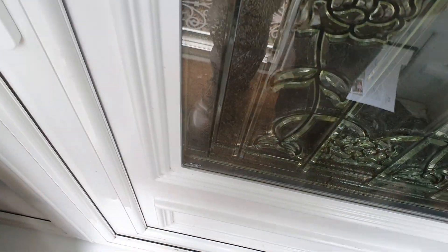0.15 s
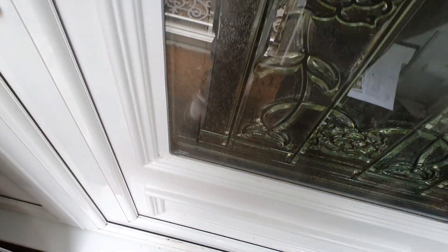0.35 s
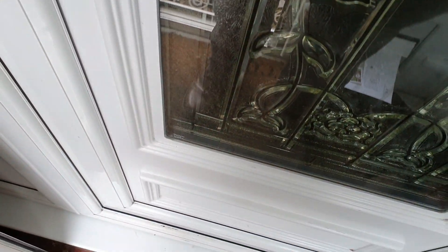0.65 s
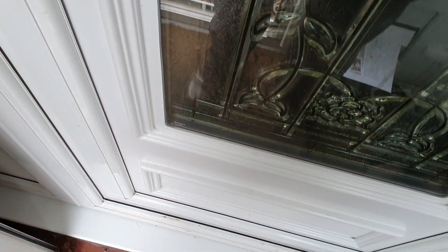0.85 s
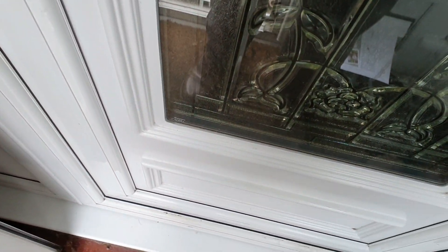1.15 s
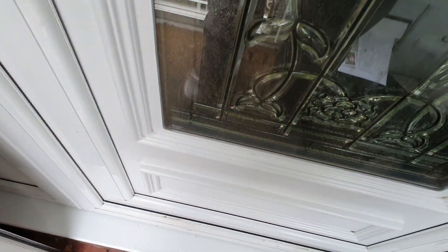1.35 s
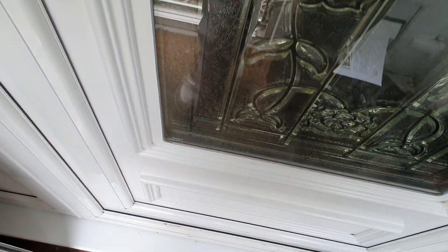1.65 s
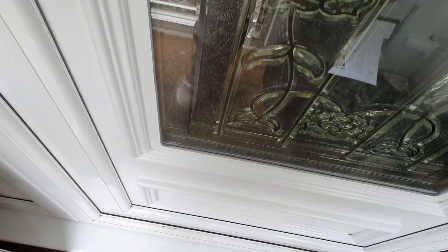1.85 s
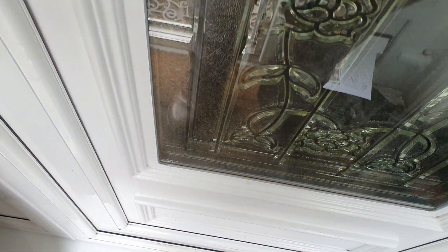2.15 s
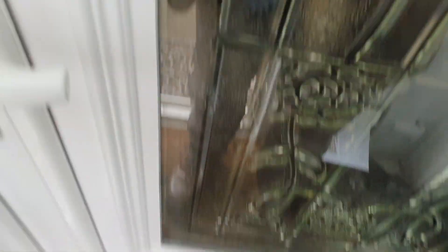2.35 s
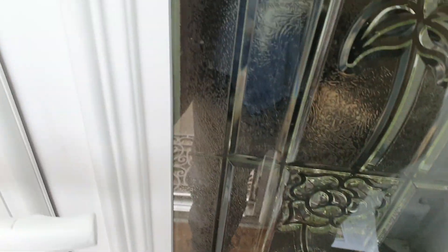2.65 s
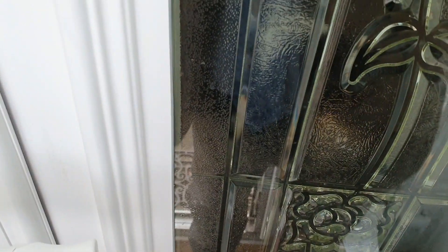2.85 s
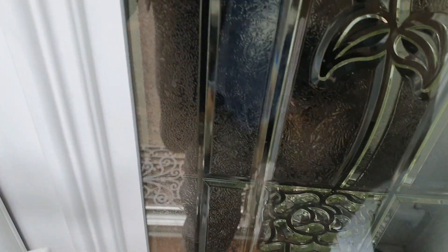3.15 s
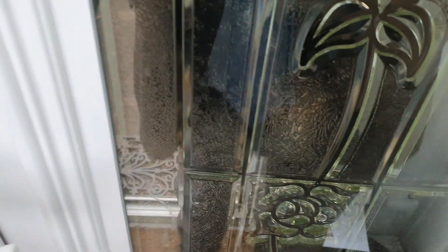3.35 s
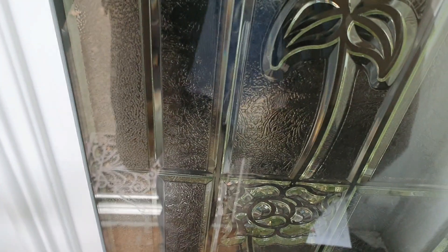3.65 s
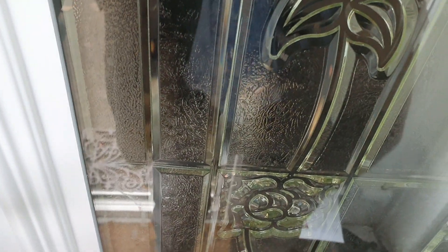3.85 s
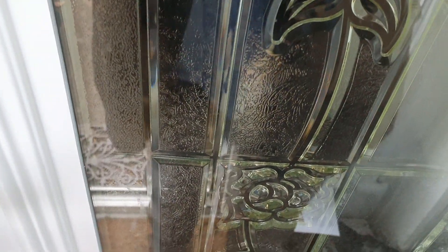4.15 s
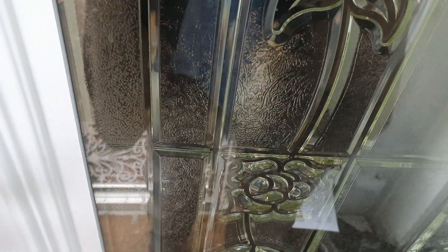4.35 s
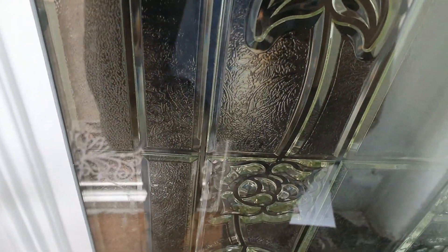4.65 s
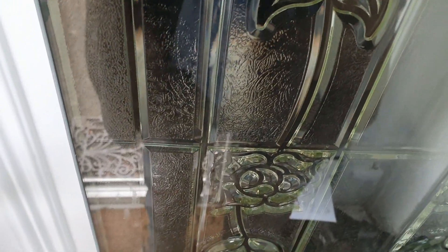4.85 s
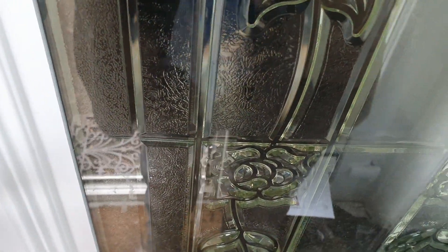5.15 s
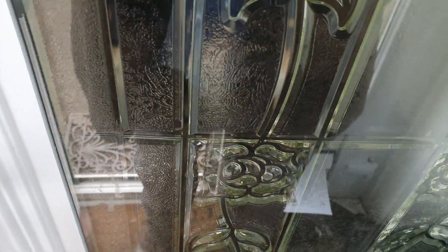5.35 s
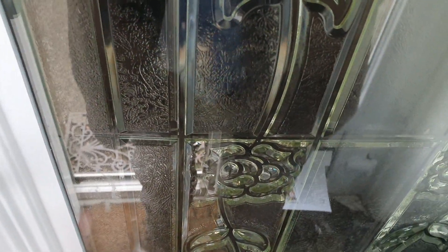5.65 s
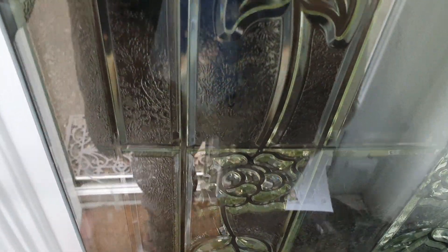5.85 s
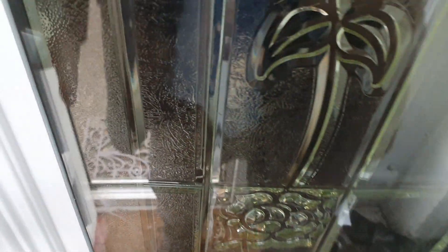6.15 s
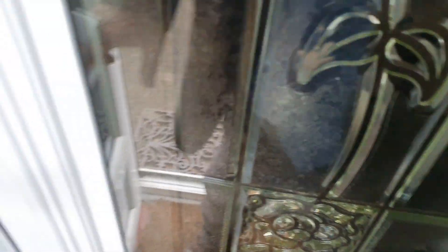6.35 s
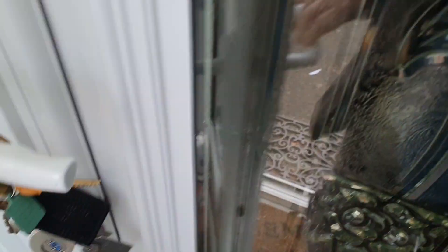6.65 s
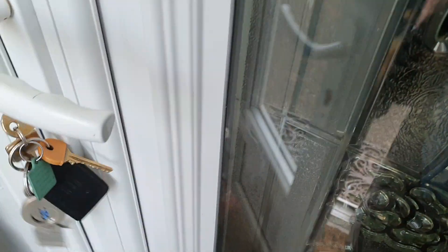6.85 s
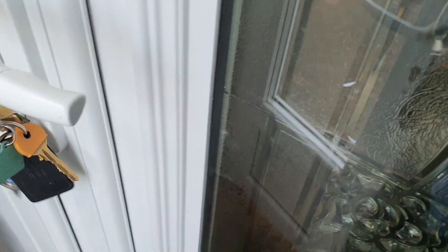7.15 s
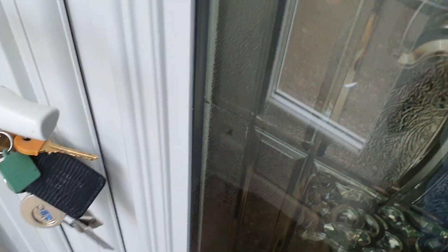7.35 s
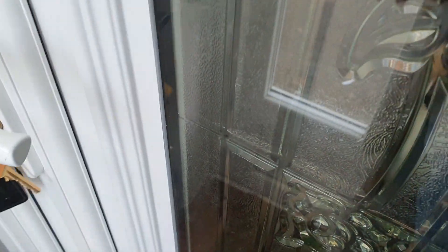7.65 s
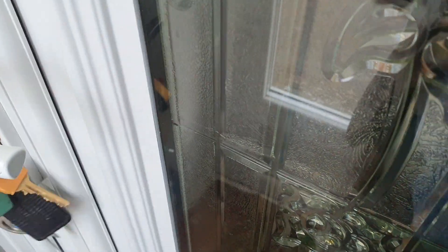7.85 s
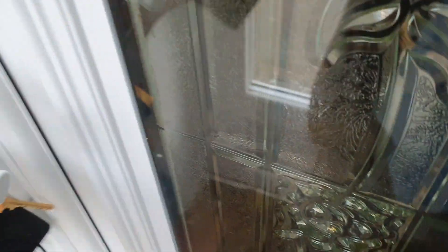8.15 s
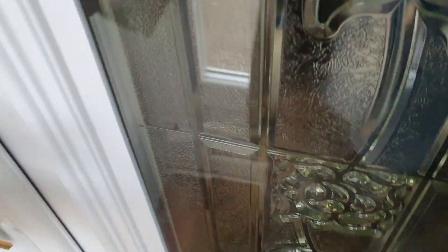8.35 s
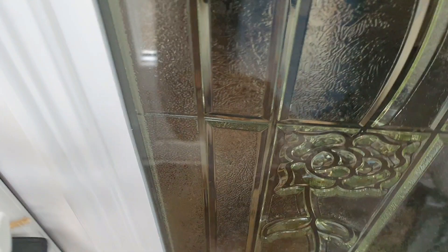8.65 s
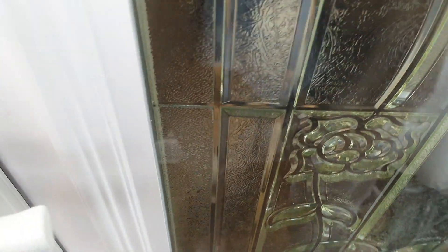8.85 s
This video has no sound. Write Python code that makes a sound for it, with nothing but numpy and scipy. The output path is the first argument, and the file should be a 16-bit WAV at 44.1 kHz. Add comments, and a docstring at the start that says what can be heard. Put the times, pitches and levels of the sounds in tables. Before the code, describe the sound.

In the hallway of a house, a bunch of steel keys jangles close to the microphone while an engine drones and tyres hiss outside, slowly fading. The keys then work the lock of a glazed plastic door, with repeated sharp clicks, rattles and dull thumps through the panel. The door swings and closes with a loud clunk that shakes its glass. The street goes quiet, and a few lighter clicks and clinks follow.

```python
"""In the hallway of a house, a bunch of keys jangles and works the lock of a glazed plastic door.
Steel keys crack and ring as they hit each other, and the lock clicks and rattles. Pushes and blows
shake the door's panel and glass; it swings and clunks shut. Outside, an engine drones and tyres hiss.
A phone with two spaced microphones listens close by."""
import sys
import numpy as np
from scipy import signal
from scipy.fft import rfft, irfft, next_fast_len
from scipy.io import wavfile
from scipy.ndimage import uniform_filter1d, map_coordinates

SR = 44100
rng = np.random.default_rng(int(sys.argv[2]) if len(sys.argv) > 2 else 0)


def dump_mix(stems):
    """Bounce the given channels to the path in sys.argv[1] as a 16-bit WAV at rate SR."""
    frames = np.atleast_2d(stems).T  # one column per channel
    limited = np.clip(frames, -1, 1)  # hard clip at full scale
    pcm = np.round(limited * 32767).astype(np.int16)
    wavfile.write(sys.argv[1], SR, pcm)


N = 397341


def amp(db):
    """Turn decibels into a gain."""
    return 10 ** (np.asarray(db) / 20)


def along(points, hz):
    """Read between (Hz, value) points on a log frequency axis."""
    f, values = np.transpose(points)
    return np.interp(np.log(hz + 1), np.log(f + 1), values)


def level_curve(points):
    """Join (time, dB) points into one level per sample, silent before the first."""
    return np.interp(np.arange(N) / SR, *np.transpose(points), left=-120)


def wobble(rate):
    """A smooth random curve through rate points a second."""
    return map_coordinates(rng.standard_normal(int(N * rate / SR) + 4), [np.arange(N) * rate / SR])


def filtered(x, response):
    """Scale and shift each frequency of x by response(Hz)."""
    size = next_fast_len(x.shape[-1] + 8192)
    return irfft(rfft(x, size) * response(np.fft.rfftfreq(size, 1 / SR)), size)[..., :x.shape[-1]]


def coloured(points):
    """A response through (Hz, dB) points."""
    return lambda hz: amp(along(points, hz))


def resonances(peaks):
    """A response made of (centre Hz, width Hz, dB) peaks."""
    return lambda f: sum((-1) ** k * amp(db) * 1j * f * width / (hz * hz - f * f + 1j * f * width)
                         for k, (hz, width, db) in enumerate(peaks))


def noise(response, grain_db=0., rate=400):
    """Stereo noise of average (rms) size 1; grain_db makes it lumpy."""
    # how alike the two microphones hear: (frequency [Hz], likeness [0 to 1])
    likeness = [(30, .995), (150, .985), (400, .85), (800, .45), (3000, .25), (15000, .15)]

    def mid_and_side(hz):
        angle = np.arccos(np.clip(along(likeness, hz), -1, 1)) / 2
        return response(hz) * [np.cos(angle), np.sin(angle)]

    pair = rng.standard_normal((2, N)) * amp(grain_db * wobble(rate))
    mid, side = filtered(pair, mid_and_side)
    stereo = np.array([mid + side, mid - side])
    return stereo / np.sqrt(np.mean(stereo ** 2) + 1e-20)


def bursts(times, db, t60, rise, pan_db=0):
    """Stereo loudness shape: each blow swells over rise seconds and fades 60 dB in t60 seconds."""
    power = np.zeros((2, N + 2 * SR))
    for start, level, life, pan, swell in np.broadcast(times, db, t60, pan_db, rise):
        t = np.arange(int(np.clip(life, .005, 1.9) * SR)) / SR
        shape = amp(level - 60 * t / life) * (1 - np.exp(-t / max(swell, 1e-4)))
        power[:, round(start * SR):][:, :len(t)] += (amp([[pan / 2], [-pan / 2]]) * shape) ** 2
    return np.sqrt(power[:, :N])


def spikes(times, db, pan_db, response):
    """One sharp pulse per blow, coloured by response."""
    pulses = np.zeros((2, N))
    signs = rng.choice([-1, 1], len(times))
    pulses[:, np.round(times * SR).astype(int)] = amp(db + np.array([pan_db, -pan_db]) / 2) * signs
    return filtered(pulses, response) / np.mean(np.abs(response(np.fft.rfftfreq(4096, 1 / SR))))


def ringing(notes, times, db, scatter_db, damp_db, blur):
    """Each blow rings every note at a new strength; touching parts vary its level and tuning."""
    out, knots = np.zeros((2, N)), np.arange(0, N + 650, 650)
    at = np.clip(np.round(times * SR).astype(int), 0, N - 1)
    for hz, level, t60 in notes:
        draw = rng.uniform(-1.6, 1.6, (len(at), 4))
        blows = np.zeros((2, N), complex)
        for mic in range(2):
            blow_db = db + level + scatter_db * draw[:, 0] + 2.4 * draw[:, 1 + mic]
            blows[mic, at] = amp(blow_db) * np.exp(1j * mic * draw[:, 3])
        pole = amp(-60 / (t60 * SR)) * np.exp(2j * np.pi * hz / SR)
        ring = signal.lfilter([1], [1, -pole], blows)
        touch, twist = (np.interp(np.arange(N), knots, v) for v in rng.standard_normal((2, len(knots))))
        out += (ring * amp(-damp_db * np.abs(touch)) * np.exp(1j * blur * twist)).imag
    return out


def street():
    """An engine's note wavers over road rumble and tyre hiss."""
    # the engine drawing away: (time [s], level [dB])
    engine_levels = [(0.0, -27), (0.9, -35.5), (1.12, -30.5), (2.6, -35), (2.76, -38.5), (4.2, -40.5),
                     (6.2, -49)]
    # a car passes, later the door shuts the street out: (time [s], level [dB])
    road_levels = [(0.0, -43), (0.6, -41.5), (1.25, -47.5), (2.9, -54), (3.9, -56.5), (5.7, -60),
                   (7.9, -59.5), (8.35, -79), (9.01, -78)]
    # tone of the rumble: (frequency [Hz], level [dB])
    rumble_tone = [(12, -50), (20, -13), (32, -1), (53, 0), (67, -3.5), (82, -22), (129, -31.5), (189, -14),
                   (340, -32), (600, -33), (780, -40), (1320, -120)]
    # tone of the tyres: (frequency [Hz], level [dB])
    tyre_tone = [(180, -60), (300, 0), (418, 1), (701, -8.5), (814, 0.5), (1120, 7.5), (1340, -2),
                 (3030, -12.5), (4020, -14), (4520, -25.5), (8790, -32), (16000, -65)]
    t = np.arange(N) / SR
    engine_hz = 48.9 - 1.52 * (t > 2.68) + 1.344 * wobble(5.4)  # the pitch drops once
    engine_db = np.where(t < engine_levels[-1][0], level_curve(engine_levels) + 0.54 * wobble(3.67), -120)
    engine = np.sqrt(2) * amp(engine_db) * np.sin(2 * np.pi * np.cumsum(engine_hz) / SR)
    road_db = level_curve(road_levels)
    flattened = lambda f: amp(np.minimum(along(rumble_tone, f), -17)) / (1 + (40 / (f + 1)) ** 4)
    rumble = amp(0.67 * road_db - 12.5 + 1.6 * wobble(6.1)) * noise(flattened)
    hiss = amp(road_db + 4.0 + 2.3 * wobble(8.2)) * noise(coloured(tyre_tone))
    # the low sounds dip briefly, twice
    dip_db = sum(db * np.exp(-((t - when) / 0.042) ** 2) for when, db in [(3.75, -12), (4.87, -27)])
    return amp(dip_db) * (engine + rumble) + hiss


def hallway(x):
    """The hallway's echo: high notes die a little sooner than low ones."""
    # echo length: (frequency [Hz], fade time [s])
    fade_times = [(300, 0.17), (2000, 0.15), (12000, 0.13)]
    hz, t, spectrum = signal.stft(rng.standard_normal((2, SR // 3)), SR, nperseg=256)
    tail = signal.istft(spectrum * amp(-60 * t / along(fade_times, hz)[:, None]), SR, nperseg=256)[1]
    return signal.fftconvolve(x, tail / np.linalg.norm(tail[0]), axes=1)[:, :N]


def door():
    """Each push or blow sways the door, hums its glass and thumps its panel; the handle rubs."""
    # pushes and blows: (time [s], panel level [dB], upper notes against it [dB], sway [dB], glass [dB])
    blows = [(3.581, -39.5, 2, -58, -52), (3.852, -59, 11, -52, -52), (4.013, -34, -3, -37, -39.5),
             (4.088, -32, -23, -35, -40), (4.147, -36, -6.5, -46, -44), (4.222, -29, -11.5, -39, -36),
             (4.696, -29.5, -12.5, -41.5, -45), (4.935, -33, -26.5, -52, -45),
             (5.061, -17.5, -22.5, -40.5, -35.5), (5.996, -22, -11.5, -55, -45),
             (6.113, -17, -18.5, -48, -52), (6.208, -14.5, -20, -45, -46), (6.79, -43, 2.5, -26, -41),
             (6.874, -28, -0.5, -24, -41), (7.001, -37.5, 1.5, -28, -49), (7.391, -48, 5.5, -36.5, -45),
             (7.513, -24, 3.5, -26, -35), (7.564, -14.5, 4.5, -13.5, -15.5), (7.755, -20, -6.5, -26, -28),
             (7.863, -26.5, -1, -40, -33), (8.001, -26, -6.5, -32, -35.5), (8.262, -36, -9, -38.5, -46),
             (8.36, -54, -2, -42, -64), (8.555, -53, 6, -51, -53), (8.719, -44, 3, -60, -51),
             (8.95, -35.5, 0, -38, -44)]
    # the whole door on its hinges: (frequency [Hz], width [Hz], level [dB])
    sway_peaks = [(32.3, 13, -1), (92, 70, -5.5)]
    # the panel's low notes: (pitch [Hz], level [dB], fade time [s])
    low_notes = [(218, -4.5, 0.29), (173, -7, 0.18)]
    # its upper notes: (pitch [Hz], level [dB], fade time [s])
    upper_notes = [(281.3, 1.5, 0.31), (376.5, -11.5, 0.4), (454.4, -5, 0.19)]
    # its murmur after a blow: (frequency [Hz], width [Hz], level [dB])
    murmur_peaks = [(231, 18, 2.5), (258, 84, 1.5), (396, 120, -11.5), (447, 45, -12.5), (690, 510, -13)]
    # the handle dragging its bolts: (time [s], level [dB])
    rub_levels = [(6.19, -44), (6.292, -34), (6.42, -62)]
    times, panel_db, upper_offset_db, sway_db, glass_db = np.transpose(blows)
    upper_db = panel_db + upper_offset_db
    glass_hz, resting_db = 128.8, -55.5  # at rest the door trembles with the street
    glass = amp(1.6 + 2.2 * wobble(12)) * np.sin(2 * np.pi * np.cumsum(glass_hz + 2.5 * wobble(14)) / SR)
    glass = glass * (bursts(times, glass_db, t60=0.72, rise=0.01) + amp(resting_db - 5))
    sway = noise(lambda f: resonances(sway_peaks)(f) ** 2)
    sway /= np.sqrt(np.abs(uniform_filter1d(np.mean(sway ** 2, axis=0), SR // 12)) + 0.12)  # even it out
    sway *= bursts(times, sway_db + 2.5, t60=0.57, rise=0.023) + amp(resting_db)
    low = ringing(low_notes, times, panel_db - 3.5, scatter_db=1.0, damp_db=-2.0, blur=0.32)
    upper = ringing(upper_notes, times, upper_db + 1.0, scatter_db=2.5, damp_db=4.0, blur=0.85)
    thumps = np.mean(low + upper, axis=0)  # long waves reach both microphones alike
    soft_contact = lambda f: (1j * f / (120 + 1j * f)) ** 2 / (1 + 1j * f / 700)
    rub = noise(resonances([(327, 140, -4), (516, 280, -6.5), (776, 290, -8.5)]), grain_db=-5.5, rate=47)
    rub *= amp(np.where(np.arange(N) / SR < rub_levels[-1][0], level_curve(rub_levels), -120))
    murmur = noise(resonances(murmur_peaks), grain_db=2.0, rate=72)
    murmur *= bursts(times, 0.78 * upper_db - 16, t60=0.82, rise=0.016)  # grows less than the blow
    shudder = noise(resonances([(810, 980, 0), (3600, 1800, 2)]), grain_db=-8.5, rate=78)
    shudder *= bursts(times, upper_db - 23, t60=0.74, rise=0.03)
    return sway + glass + filtered(thumps, soft_contact) + rub + murmur + shudder


def lock():
    """Parts slide and click: a short pulse and a tick, then the case rattles and the panel knocks."""
    # lock clicks: (time [s], level [dB], pitch [Hz], knock level [dB], rattle fade time [s])
    clicks = [(1.983, -38, 956, -50, 0.5), (2.2028, -21.5, 3150, -65, 0.02),
              (2.264, -29, 3700, -57.5, 0.031), (2.6082, -32.5, 3630, -75, 0.11),
              (3.006, -44, 3600, -89, 0.1), (3.58, -19.5, 2010, -35, 0.082),
              (3.7673, -33.5, 2060, -40, 0.059), (3.988, -37, 2000, -54, 0.11),
              (4.018, -29.5, 2030, -50, 0.1), (4.094, -31.5, 1040, -38.5, 0.085),
              (4.281, -31.5, 2160, -49, 0.028), (4.4369, -26.5, 1980, -36, 0.13),
              (4.5334, -16, 2270, -81, 0.16), (4.687, -39, 2620, -51, 0.12),
              (4.6969, -31.5, 1810, -37, 0.25), (4.9313, -20.5, 1930, -32, 0.17),
              (4.9816, -16, 1850, -33.5, 0.073), (5.02, -22, 2590, -50, 0.24),
              (5.0487, -19, 1930, -21, 0.17), (5.069, -12, 2120, -27.5, 0.12),
              (5.1997, -34.5, 1990, -45, 0.083), (5.5884, -36.5, 2303, -62, 0.077),
              (5.6441, -19.5, 2880, -31, 0.053), (5.7383, -38.5, 2360, -68, 0.12),
              (5.8474, -33.5, 2170, -41, 0.15), (5.8762, -26, 3360, -31.5, 0.18),
              (5.9822, -14, 2970, -46, 0.083), (5.996, -10.5, 1600, -38, 0.086),
              (6.0298, -13.5, 3430, -48.5, 0.037), (6.0828, -39, 3190, -60, 0.053),
              (6.111, -17, 1600, -57, 0.07), (6.1466, -12.5, 2880, -46.5, 0.047),
              (6.526, -28.5, 2700, -50, 0.034), (6.551, -30.5, 2810, -41, 0.074),
              (6.5736, -19, 1720, -32, 0.027), (6.624, -29, 1660, -53, 0.13), (6.821, -31, 1120, -33, 0.36),
              (6.9803, -49, 2050, -52, 0.084), (7.5105, -16.5, 2590, -18, 0.19),
              (7.568, -13, 1550, -17.5, 0.31), (7.612, -22, 3320, -29.5, 0.1),
              (7.652, -21.5, 3720, -31.5, 0.15), (7.7306, -27, 2380, -54, 0.2),
              (7.86, -28.5, 1060, -32, 0.054), (8.003, -33.5, 1690, -36, 0.3),
              (8.093, -39, 1650, -38, 0.098), (8.1187, -26.5, 1360, -35.5, 0.11),
              (8.2173, -38.5, 2100, -45.5, 0.11), (8.5465, -36, 2440, -67, 0.11),
              (8.7009, -20.5, 2180, -46, 0.17), (8.913, -45.5, 2190, -56, 0.14),
              (8.9502, -36, 2080, -39, 0.17), (8.977, -32.5, 2160, -44, 0.16)]
    # tone of the lock case and frame: (frequency [Hz], level [dB])
    case_tone = [(180, -34), (300, -12), (614, -8.5), (1580, -1), (2610, -5), (3400, -2.5), (4830, -17),
                 (7200, -16.5), (8090, -36), (13300, -31.5), (14000, -30), (16000, -33.5)]
    # parts sliding in the lock and frame: (time [s], level [dB])
    slide_levels = [(3.4, -62), (3.9, -53.5), (4.2, -45), (4.6, -49), (4.9, -60.5), (5.46, -50.5),
                    (5.73, -55), (6.18, -40), (6.54, -56), (7.0, -41.5), (7.2, -56), (7.4, -58),
                    (7.44, -41), (7.6, -45), (8.06, -49.5), (8.25, -56), (8.9, -65.5), (9.01, -58)]
    times, click_db, pitches, knock_db, t60 = np.transpose(clicks)
    pulses, t = np.zeros(N + SR), np.arange(SR // 50) / SR
    for start, db, hz in zip(times, click_db, pitches):
        pulses[round(start * SR):][:len(t)] += amp(db + 8.5 - 60 * t / .0045) * np.sin(2 * np.pi * hz * t)
    case = noise(coloured(case_tone), grain_db=3.5, rate=640)
    rattle = bursts(times, click_db - 6.5, np.clip(t60, .02, .4), rise=0.0002) * case
    knock = bursts(times, knock_db - 4.0, t60=0.13, rise=0.00074) * noise(resonances([(658, 560, 0)]))
    sliding = amp(level_curve(slide_levels) - 1.5) * noise(coloured(case_tone), grain_db=4.5, rate=120)
    ticks = spikes(times, click_db - 1, np.zeros_like(times), resonances([(2800, 4500, 0)]))
    no_bass = lambda f: (1j * f / (600 + 1j * f)) ** 2  # small parts push no bass
    return filtered(pulses[:N] + ticks, no_bass) + rattle + knock + sliding


def key_chatter(shaking, life, count):
    """Tiny contacts, each a short note of random pitch that follows the strength of the shaking."""
    draw, age = rng.random((count, 6)), np.arange(SR // 50)
    at = (draw[:, 0] * (N - 1)).astype(int)
    hz, t60 = 3000 + 12800 * draw[:, 1:2], life * (0.17 + draw[:, 2:3])
    fade = (1.01 - draw[:, 3:4]) ** -.4 * amp(-60 * age / SR / t60)
    phase, shift = 2 * np.pi * hz * age / SR, 3 * draw[:, 4:5]
    notes = [shaking[mic, at, None] * fade * np.sin(phase + mic * shift) for mic in range(2)]
    return np.array([np.bincount((at[:, None] + age).ravel(), side.ravel(), N + SR)[:N] for side in notes])


def keys():
    """Single metal clinks crack and ring the keys; between them the bunch chatters at random."""
    # metal clinks, keys striking each other and later the lock and door fittings:
    # (time [s], level [dB], big key [dB], small keys [dB], brightness [dB])
    clinks = [(0.1535, -39, -45, -48, -13), (0.2433, -32, -50, -56, -5), (0.303, -17.5, -61, -39, -3),
              (0.3725, -24, -55, -62, -6), (0.4279, -16, -55, -43, -8), (0.4531, -8, -33, -23, -8),
              (0.4683, -2, -51, -41, -13), (0.5621, -20, -53, -63, -10), (0.7565, -39, -69, -59, -1),
              (1.1217, -30.5, -68, -52, -6), (1.1473, -24, -63, -59, -9), (1.356, -30.5, -64, -71, -13.5),
              (1.4947, -26, -54, -64, -12), (1.6345, -21, -52, -53, -18.5), (1.67, -15.5, -49, -36, -18.5),
              (1.7227, -28, -54, -58, -12), (1.792, -30, -55, -43, -16), (1.9059, -31, -39.5, -35, -17),
              (1.949, -17, -54, -38, -23), (1.9705, -21.5, -45, -42.5, -17), (1.9854, -8.5, -43, -33, -12),
              (2.0303, -12, -37, -44, -11), (2.083, -23, -42, -29, -23.5), (2.116, -10, -38, -28.5, -14),
              (2.163, -12, -48, -32.5, -1), (2.2015, -20, -56, -44, -26), (2.2636, -25.5, -53, -41, 0),
              (2.356, -15.5, -35, -49, -16), (2.395, -12.5, -44, -39, -8), (2.4194, -31, -41.5, -32, -12),
              (2.4818, -34, -40, -58, -10), (2.5454, -20, -37, -39.5, -7), (2.589, -23, -40.5, -42, -16),
              (2.713, -31, -69, -56, -5), (2.7508, -16, -54, -57, -22), (2.8447, -16.5, -44, -38, -8),
              (2.9033, -20, -50, -54, -24), (2.9667, -16.5, -46.5, -48, -9), (2.9822, -18, -46.5, -36, -5),
              (3.0063, -19.5, -57, -52, -5), (3.0932, -18, -59, -56, -21), (3.1857, -33, -62, -58, -3),
              (3.234, -26, -59, -58, -2), (3.3448, -16.5, -99, -33, -18), (3.3836, -22, -54, -36, 0),
              (3.5018, -22.5, -50, -64, -4), (3.5795, -38, -60, -41, -20), (3.6765, -39, -71, -70, -12),
              (3.7217, -31.5, -67, -64, -11), (4.022, -33, -72, -51, -3), (4.0941, -34, -70, -54, -14),
              (4.151, -25, -63.5, -52, -23), (4.1769, -22, -71, -53, -10), (4.2773, -30.5, -68, -63, -12.5),
              (4.349, -37, -64, -60, -6), (4.462, -18.5, -56, -47, -3), (4.4754, -18.5, -41, -39, 1),
              (4.5072, -15.5, -39, -36, -4), (4.6482, -28, -41, -31, 1), (4.6853, -11.5, -41, -39, 1.5),
              (4.9288, -10, -39, -27.5, -15), (4.9791, -14.5, -42, -46, -11), (5.016, -9, -34, -42, -11),
              (5.0581, 3, -30.5, -44, -16.5), (5.1292, -24, -38, -38, 3.5), (5.3433, -31, -54, -38, 2),
              (5.3736, -14, -53.5, -27.5, 1), (5.414, -11.5, -34, -24, -6),
              (5.4249, -6.5, -33.5, -22.5, -8), (5.6425, -9, -31, -26.5, -2), (5.749, -27, -63, -54, -9.5),
              (5.7654, -25, -49, -57, 8), (5.8588, -18.5, -35, -37, -7), (5.878, -10.5, -33, -30, -2),
              (5.9807, -5, -35, -35, -19), (6.0155, -18, -26.5, -24, -1), (6.084, -36.5, -42, -52, -26),
              (6.111, -16, -44, -31, -25), (6.1462, -0.5, -16.5, -36, -16), (6.2194, -15, -34, -45, 0.5),
              (6.336, -18.5, -53, -47, -10), (6.4657, -19, -53, -46, -8), (6.5257, -13.5, -62, -35, -41.5),
              (6.6238, -26, -49, -57, -14), (6.8848, -22, -28, -37, -26), (7.5088, -18, -38.5, -44, -21),
              (7.5693, -18.5, -34, -48, -25), (8.118, -42, -57, -67, -24), (8.687, -39, -51, -49, -15),
              (8.6986, -15.5, -28, -39, -38), (8.7908, -30, -61, -44.5, -11), (8.96, -33, -60, -60, -1)]
    # how hard the hand shakes the bunch: (time [s], level [dB])
    shake_levels = [(0.0, -53.5), (1.0, -62.5), (1.8, -58.5), (2.13, -36.5), (2.7, -62), (3.4, -47.5),
                    (3.8, -62), (4.1, -64.5), (4.55, -44), (4.9, -53), (5.25, -43), (5.7, -50), (5.95, -28),
                    (6.45, -60), (7.2, -65.5), (7.6, -55), (8.3, -67.5), (8.9, -67.5), (9.01, -43)]
    # where the bunch hangs: (time [s], left minus right [dB])
    positions = [(0, 3), (1.5, 9), (1.65, -10.5), (3.4, -3.5), (3.7, 6), (9.01, 9)]
    # tone of steel on steel: (frequency [Hz], level [dB])
    steel_tone = [(1180, -16), (2000, -2.5), (2860, -0.5), (4120, 1), (5680, 3.5), (6590, 3.5), (7060, 2.5),
                  (8550, -8), (10100, 1), (16000, -6)]
    # the big key's notes: (pitch [Hz], level [dB], fade time [s])
    big_notes = [(4161, 0, .3), (9800, -7, .14), (10775, -9, .15)]
    # the small keys' notes: (pitch [Hz], level [dB], fade time [s])
    small_notes = [(7110, -2, .09), (4947, -10, .08), (5491, -8, .1), (5997, -12, .07), (10430, -11, .1),
                   (11790, -8, .1)]
    # the bunch's highest notes: (pitch [Hz], level [dB], fade time [s])
    top_notes = [(14318, -4, .14), (15600, -6, .1), (12160, -8, .12), (12370, -10, .1), (13220, -9, .1),
                 (15170, -7, .1)]
    in_lock_s, door_swings_s = 3.55, 6.7
    times, clink_db, big_db, small_db, bright_db = np.transpose(clinks)
    in_hand = times < in_lock_s
    rise, snap_db = np.where(in_hand, 0.0046, 0.0042), clink_db + np.where(in_hand, -7, -5)
    pan_db = np.interp(times, *np.transpose(positions))
    tone = coloured(steel_tone)

    steel = noise(tone, grain_db=9.5, rate=900)
    treble = filtered(steel, lambda f: 1 / (1 + (11000 / (f + 1)) ** 6))
    blows = bursts(times, clink_db - 16.0, t60=0.082, rise=rise, pan_db=pan_db)
    crack = blows * (steel - treble)
    crack += bursts(times, clink_db + bright_db + 0.67, t60=0.069, rise=0.17 * rise, pan_db=pan_db) * treble
    snap = bursts(times, snap_db - 3.5, t60=0.0051, rise=0.00013, pan_db=pan_db) * noise(tone)
    snap += spikes(times + .0004, snap_db - 2, pan_db, lambda f: tone(f) * (f < 16000))

    # the bunch keeps moving after each clink, and light touches ring the keys too
    shaking = amp(level_curve(shake_levels)) + bursts(times, clink_db - 35, t60=0.44, rise=0.022)[0]
    touches = rng.uniform(0, N / SR, 700)
    touch_db = 20 * np.log10(shaking[(touches * SR).astype(int)]) - 9
    hits = np.append(times, touches)
    # the late clinks come from the lock and door metal, so the big key rings less
    big_hits_db = np.append(big_db + 5.5, touch_db - 2.5) - 18 * (hits > door_swings_s)
    small_hits_db = np.append(small_db + 6.5, touch_db + 3.5)
    top_hits_db = np.append(clink_db + bright_db - 4, touch_db + 9.0)
    rings = ringing(big_notes, hits, big_hits_db, scatter_db=1.8, damp_db=9.5, blur=1.3)
    rings += ringing(small_notes, hits, small_hits_db, scatter_db=2.0, damp_db=10.0, blur=3.05)
    rings += ringing(top_notes, hits, top_hits_db, scatter_db=3.5, damp_db=11.0, blur=2.6)
    chatter = amp(-5.5) * key_chatter(shaking + .5 * blows, life=0.022, count=4000)
    rustle = amp(-5) * shaking * noise(tone, grain_db=5.5, rate=140)
    return crack + snap + rings + chatter + rustle


def scene():
    """Keys and lock echo in the hallway and join door and street; the left microphone hears first."""
    near = keys() + amp([[-1.2], [1.2]]) * lock()
    left, right = near + amp(-5.5) * hallway(near) + door() + street()
    delay_s = lambda f: 20 / SR / (1 + (700 / (f + 1)) ** 4)  # bass reaches both together
    right = filtered(right, lambda f: np.exp(-2j * np.pi * f * delay_s(f)))
    return np.array([amp(0.66) * left, amp(2.14) * right])


def record(dry):
    """The phone squeezes loud peaks and cuts off the highest treble."""
    ceiling, edge_hz, top_hz = 0.88, 15800, 17167
    squeezed = dry / (1 + np.abs(dry / ceiling) ** 4) ** (1 / 4)
    treble_cut = lambda hz: np.where(hz < edge_hz, 1, amp(-35 - (hz - edge_hz) / 40)) * (hz < top_hz)
    return filtered(squeezed, treble_cut)


dry = scene()
out = record(dry)
dump_mix(out)
```